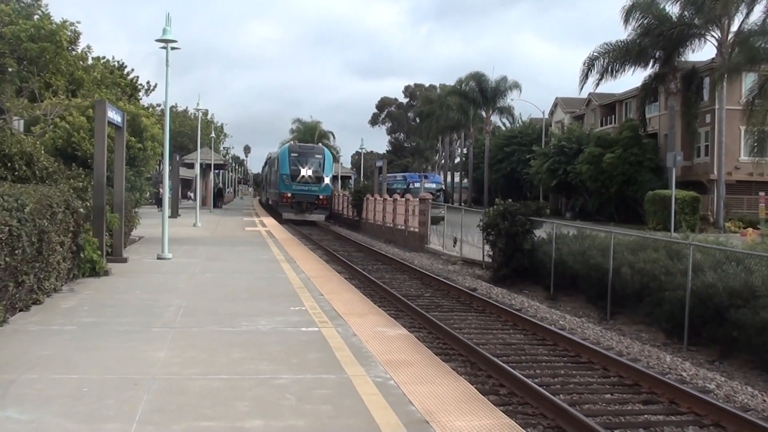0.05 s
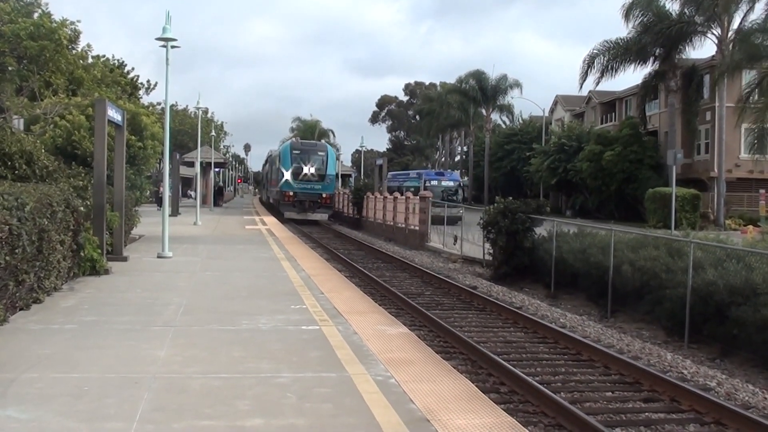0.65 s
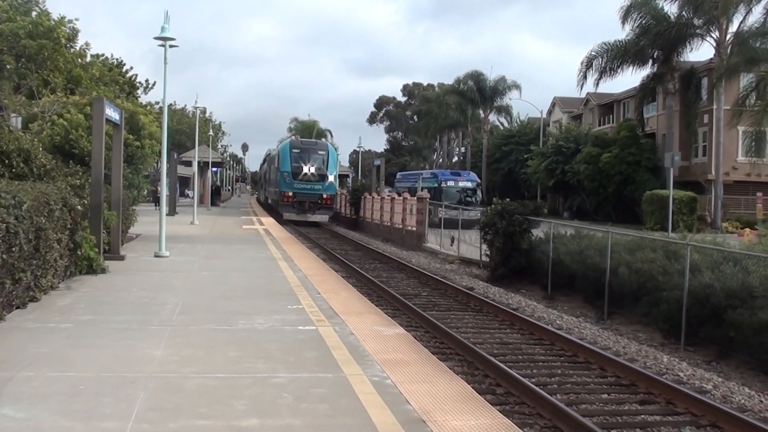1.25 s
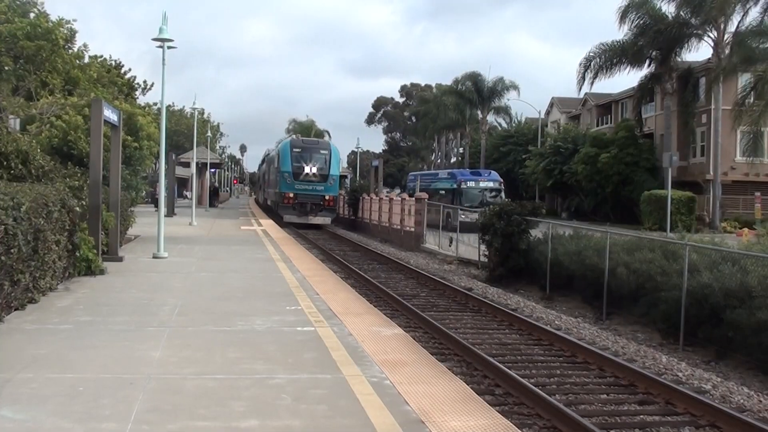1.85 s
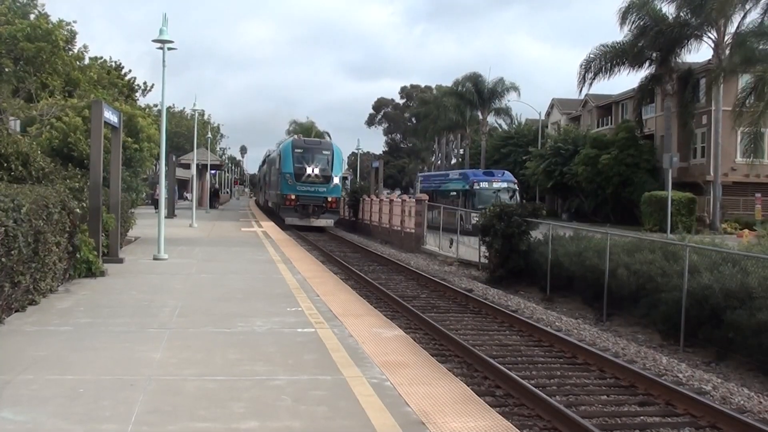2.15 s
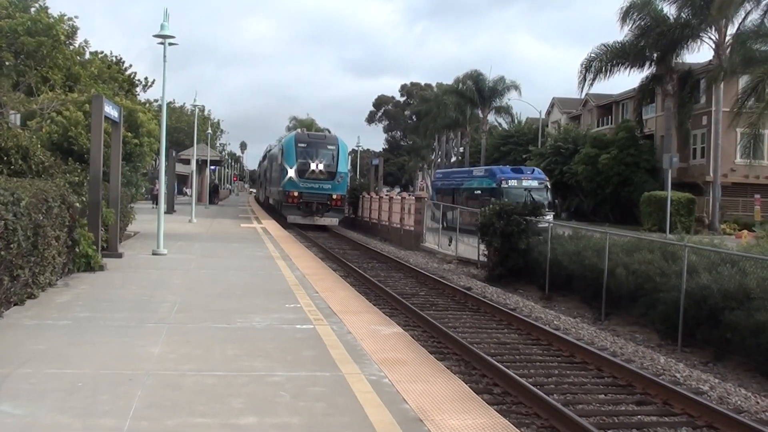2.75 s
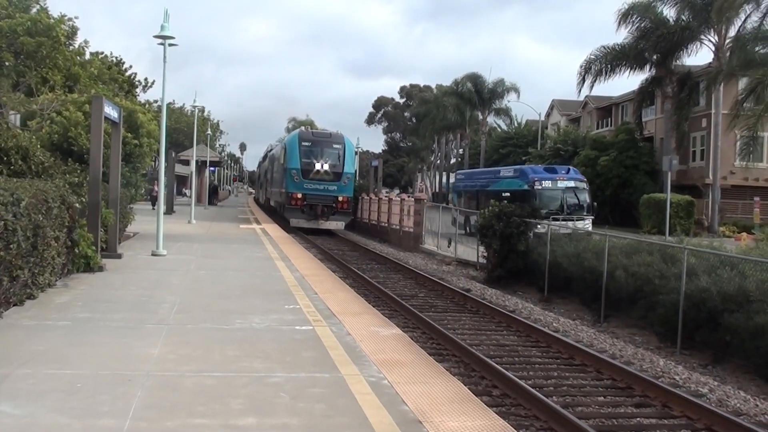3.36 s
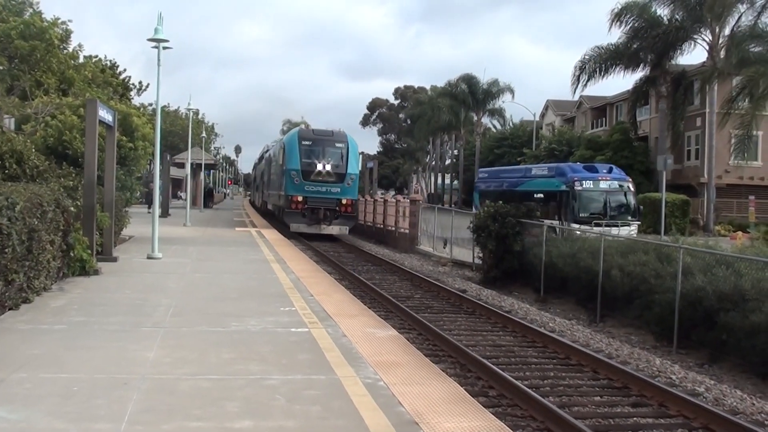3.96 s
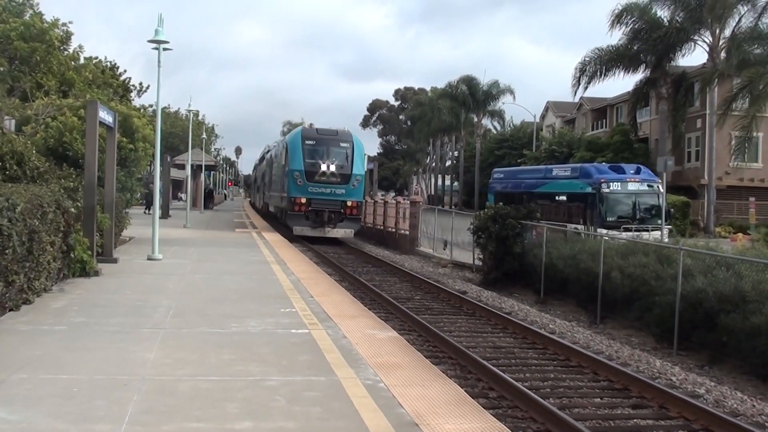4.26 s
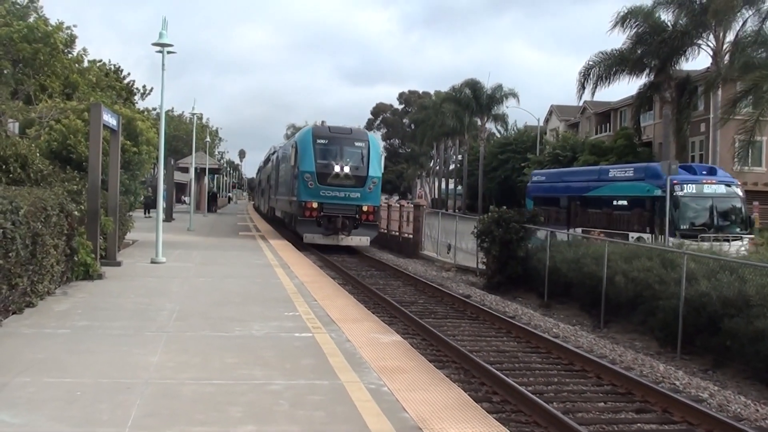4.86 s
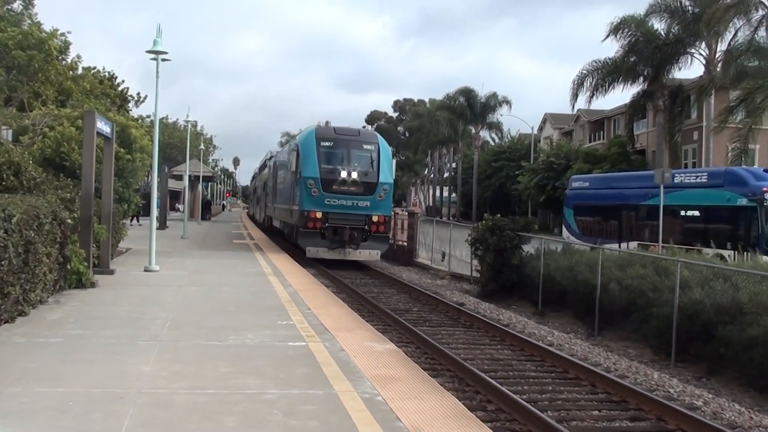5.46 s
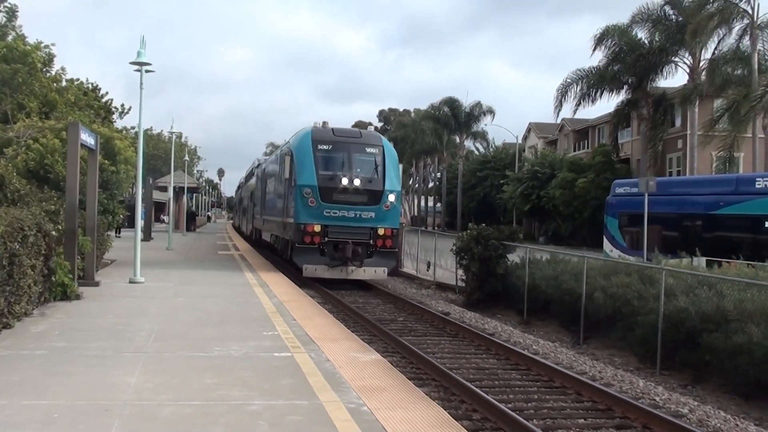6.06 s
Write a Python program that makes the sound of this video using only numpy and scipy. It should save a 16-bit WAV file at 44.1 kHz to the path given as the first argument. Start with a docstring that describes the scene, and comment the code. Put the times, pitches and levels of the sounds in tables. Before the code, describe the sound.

A diesel locomotive pulls out of an outdoor station towards a listener on the platform. Its bell clangs evenly, about three times every two seconds, ringing back off nearby buildings. Underneath, the engine rumble grows, a thin turbocharger whistle climbs and an electric whine swells. Faint ticks and soft knocks dot the first part, and brief spits of air come from halfway on as the train gets louder.

```python
"""A diesel locomotive rings its bell steadily as it pulls out of a station towards the listener.
Each blow gives a noisy clang and a throbbing ring. Underneath, the engine revs up, the turbocharger
whistles upwards, the traction drive sings and air valves spit, among small ticks and soft knocks.
Buildings beside and behind the train send bell and drive back with a smaller or reversed Doppler shift."""
import sys
import numpy as np
from scipy import signal
from scipy.fft import rfft, irfft, next_fast_len
from scipy.io import wavfile

SR = 44100
rng = np.random.default_rng(int(sys.argv[2]) if len(sys.argv) > 2 else 0)


def log_audio(samples):
    """Write samples as a 16-bit WAV file to the path given in sys.argv[1]."""
    # one column per channel
    frames = np.atleast_2d(samples).T
    # limit to full scale, then quantise
    limited = np.clip(frames, -1, 1)
    pcm = np.round(limited * 32767).astype(np.int16)
    wavfile.write(sys.argv[1], SR, pcm)


N = 269010
LEAD = SR  # samples of pre-roll, so the scene opens already ringing
TIME = np.arange(-LEAD, N) / SR

# colour of the microphone's own hiss: freq_hz, level_db
FLOOR_COLOUR = [(5000, 2.5), (9000, -3.5), (12000, -8), (16000, -8)]
# soft knocks around the station: start_s, pitch_hz, level_db, length_s
KNOCKS = [(2.034, 268, -25.5, 0.095), (2.438, 250, -28, 0.065), (2.786, 175, -28, .09),
          (2.95, 1005, -27.5, 0.076)]
# sharp ticks close by: start_s, level_db, t60_s
TICKS = [(1.2895, -22.5, 0.0039), (2.013, -28, 0.0039), (2.185, -22.5, .005), (2.3885, -28, .005),
         (2.8235, -24, 0.0055), (3.595, -27, 0.0049), (4.4245, -19, 0.0035), (5.1225, -25, .005)]
# colour of a tick: freq_hz, level_db
TICK_COLOUR = [(3000, -9.5), (5500, 1), (7300, 4.5), (9500, -7), (13000, -12), (16000, -16)]

# air valves spitting: start_s, level_db, t60_s
SPITS = [(4.122, -39, .3), (5.847, -30.5, 0.31), (5.958, -41.5, 0.95)]
# colour of a spit: freq_hz, level_db
SPIT_COLOUR = [(3000, -14), (5500, -2), (7000, 5), (9000, -6), (13000, -14), (16000, -26)]
# thin jets of escaping air: start_s, level_db, t60_s
JETS = [(2.992, -40.5, 0.77), (3.215, -48.5, .6)]
# colour of a jet: freq_hz, level_db
JET_COLOUR = [(9000, -35), (11300, -10), (12300, 1), (13500, 1), (15800, 1.5)]
# brief squeals of that air: start_s, level_db, t60_s
SQUEALS = [(3.0, -51, .7), (3.25, -48, .6)]
# narrow band of a squeal: freq_hz, level_db
SQUEAL_COLOUR = [(10100, -40), (10480, 0), (10620, 0), (11000, -40)]

# the train's speed towards the listener: time_s, speed_m_per_s
TRAIN_SPEED = [(-1, 1.135), (7, 5.575)]
# the diesel revving up: time_s, shaft_hz, hum_db
ENGINE_REVS = [(0, 22.3, -4), (1, 23, -4), (2, 24.4, 0), (3, 24.6, 2), (4, 25.2, 4.5), (5, 25.2, 6.5),
               (6.1, 25.7, 6.5)]
# orders of its hum: shaft_multiple, level_db
ENGINE_ORDERS = [(2, -60), (3, -54.5), (5, -43), (7, -36.5), (8, -40), (12, -40.5), (13, -47)]
# swells of the exhaust boom: time_s, level_db
BOOM_LEVEL = [(0.0, -40), (0.73, -43.5), (0.9, -32.5), (1.07, -42), (1.21, -32), (1.34, -53), (1.39, -37),
              (1.8, -42.5), (2.0, -32.5), (2.43, -44), (3.16, -42), (3.86, -47), (4.74, -36), (5.64, -41),
              (6.1, -33.5)]
# colour of the exhaust rumble: freq_hz, level_db
RUMBLE_COLOUR = [(15, -14.5), (33, -14), (52, -6.5), (72, 3.5), (92, 4), (120, 4.5), (160, -29)]
# colour of the engine body: freq_hz, level_db
BODY_COLOUR = [(85, -27.5), (125, -6.5), (180, -1.5), (240, -2), (300, -1), (400, -5.5), (520, -17),
               (700, -34)]
# colour of the fan roar: freq_hz, level_db
ROAR_COLOUR = [(350, -12), (530, -7.5), (660, 2), (850, 2), (1080, -3.5), (1250, -10), (1600, -3),
               (2000, -13.5), (2450, -7.5), (2900, -12.5), (3400, -10.5), (3900, -33), (5000, -26)]
# colour of the hiss on top: freq_hz, level_db
HISS_COLOUR = [(2500, -13.5), (3600, 1.5), (4500, 0.5), (5300, -1), (6300, -8.5), (7300, -4.5),
               (8500, -15.5), (10000, -19.5), (13000, -27), (16000, -34.5)]
# mix of rumble, body, roar and hiss, a row each: start_db, db_per_shaft_hz, db_per_metre
RUSH_MIX = [(-47, 0.54, 0.19), (-37, 1.32, 0.0939), (-36.5, 0.17, 0.2364), (-49.5, 0.88, .5)]
# stereo lean of that mix: freq_hz, left_minus_right_db
RUSH_PAN = [(60, -0.2), (250, -1.5), (600, -2.3), (1200, 4), (2500, 1), (4500, -2.5), (8000, 0)]

# the traction drive's tones at rest: pitch_hz, level_db
DRIVE_TONES = [(839.4, 0.5), (784, -10.5), (1052, -17.5), (1673, -9), (2540, -24), (3364, -15),
               (4210, -19.5)]
# swell of its song: time_s, level_db
DRIVE_LEVEL = [(0.0, -48), (1.0, -38.5), (2.45, -39.5), (3.1, -32), (5.16, -33), (5.48, -26), (5.58, -36),
               (5.62, -27.5), (6.02, -27.5)]
# the turbocharger's blade tone spooling up: time_s, pitch_hz
TURBO_PITCH = [(0, 2535), (2, 3027), (6.1, 4520)]
# swell of its whistle: time_s, blade_db, octave_db
TURBO_LEVEL = [(0, -50, -51), (.6, -48.5, -63), (2, -50, -59), (3.2, -40.5, -53.5), (3.8, -52, -43.5),
               (4.4, -40, -43), (4.8, -35.5, -51), (5.1, -41.5, -49), (5.6, -25, -49.5), (6.1, -24.5, -46)]

# blows on the bell: start_s, note_db, hit_db, top_db
BELL_STROKES = [(-.262, -6.5, -2.5, -6), (.423, -5.5, -3, -11), (1.110, -2, 0, -6), (1.797, 1, 1, -0.5),
                (2.484, -1, 2.5, 2), (3.169, -1.5, 2.5, -1.5), (3.855, -0.5, 2, -2), (4.541, 1, 2.5, -7),
                (5.220, -0.5, 5, 3), (5.904, -2.5, 6, 3)]
# its strike note at rest: pitch_hz, level_db, t60_s
STRIKE_NOTE = (1730, -11, 1.9)
# its slow-blooming top overtone at rest: pitch_hz, level_db, t60_s
TOP_NOTE = (4127.5, -32.5, 1.39)
# its other modes at rest: pitch_hz, level_db, t60_s
BELL_MODES = [(927, -34.5, 0.15), (1007, -26, 0.1), (1117.6, -21.5, 0.094), (1528, -23, 0.46),
              (1557, -28.5, 2.45), (2393, -35.5, 0.41), (2500, -44.5, 0.66), (2857, -34.5, 1.55),
              (2840, -29.5, 0.24), (3265, -40, .45), (3450, -36.5, .5), (3497, -38, 0.48),
              (5280, -52, 0.91), (5930, -52.5, 0.46)]
# colour of the clang: freq_hz, level_db
CLANG_COLOUR = [(600, -41), (950, 4), (1130, -11.5), (1330, -10.5), (1480, -2.5), (1570, 2), (1650, -0.5),
                (1770, 15.5), (1860, -3), (2000, -12.5), (2400, -8), (3500, -14), (3800, -21),
                (7000, -42.5)]


def gain_of(db):
    """Decibels as a gain."""
    return 10 ** (np.asarray(db) / 20)


def unit_rms(x):
    """Normalises a signal to an RMS of one."""
    return x / np.sqrt(np.mean(x ** 2) + 1e-20)


def follow(rows):
    """One automation curve for each column after the time."""
    times, *columns = np.transpose(rows)
    return [np.interp(TIME, times, column) for column in columns]


def equalise(x, curve):
    """Filters by an EQ curve of (freq_hz, level_db) points."""
    hz, db = np.transpose(curve)
    size = next_fast_len(len(TIME))
    bins_hz = np.fft.rfftfreq(size, 1 / SR)
    response = gain_of(np.interp(np.log(bins_hz + 1), np.log(hz), db))
    return irfft(rfft(x, size) * response, size)[..., :len(TIME)]


def noise(colour):
    """Coloured noise of unit level, rolled off beyond the curve's ends."""
    curve = [(colour[0][0] / 2, -90), *colour, (colour[-1][0] * 2, -90)]
    return unit_rms(equalise(rng.standard_normal(len(TIME)), curve))


def wander(hz):
    """Random modulation of unit size, moving at up to about hz."""
    knots = np.arange(TIME[0], TIME[-1] + 1, .5 / hz)
    return unit_rms(np.interp(TIME, knots, rng.standard_normal(4096)[:len(knots)]))


def burst(start_s, t60_s, rise_s):
    """Envelope with a rounded attack and an exponential tail."""
    envelope = np.zeros(len(TIME))
    at = max(round(start_s * SR) + LEAD, 0)
    age = np.arange(len(TIME) - at)[:int(t60_s * SR) + 1] / SR
    envelope[at:at + len(age)] = (1 - np.exp(-age / rise_s)) ** 2 * gain_of(-60 * age / t60_s)
    return envelope


def noise_bursts(cues, colour, rise_s):
    """A dying burst of coloured noise on each cue."""
    return noise(colour) * sum(gain_of(db) * burst(start_s, t60_s, rise_s) for start_s, db, t60_s in cues)


def pan(x, left_db):
    """Mono to stereo, with the left channel left_db above the right."""
    return x * gain_of([[left_db / 2], [-left_db / 2]])


def metres_travelled():
    """Distance the train has rolled."""
    return np.cumsum(follow(TRAIN_SPEED)[0]) / SR


def travel_saved():
    """Seconds of sound travel saved as the train nears, zero at mid-scene."""
    saved_s = metres_travelled() / 343
    return saved_s - saved_s[LEAD + N // 2]


def station(x, echo_db, left_db, spread_s=.3, fade_db=9, width_db=10, walls=20):
    """Direct sound plus wall echoes; each path shortens or lengthens as the train moves."""
    saved_s = travel_saved()
    jitter, bearings, sides = rng.random((walls, 3)).T
    lateness = (np.arange(walls) + jitter) / walls
    gains = gain_of(-fade_db * lateness)
    gains *= gain_of(echo_db) / np.linalg.norm(gains)
    cosines = np.clip(.75 - 2 * bearings, -1, 1)  # walls ahead raise the pitch, walls behind lower it
    out = pan(np.interp(TIME + saved_s, TIME, x), left_db)
    for delay_s, cosine, gain, side in zip(.012 + spread_s * lateness, cosines, gains, sides):
        echo = gain * np.interp(TIME - delay_s + cosine * saved_s, TIME, x)
        out += pan(echo, width_db * (side - .5))
    return out


def noise_floor(level_db=-56):
    """The microphone's own steady hiss."""
    return gain_of(level_db) * noise(FLOOR_COLOUR)


def knocks():
    """Distant knocks, blurred to short swells of one resonance."""
    out = np.zeros(len(TIME))
    for start_s, hz, db, length_s in KNOCKS:
        swell = np.sin(np.pi * np.clip((TIME - start_s) / length_s, 0, 1)) ** 2
        out += gain_of(db) * swell * np.sin(2 * np.pi * hz * TIME)
    return out


def ticks():
    """Dry, bright ticks: a few milliseconds of noise each."""
    return noise_bursts(TICKS, TICK_COLOUR, rise_s=.0001)


def air_valves():
    """Air escapes in sharp spits, thin jets and brief squeals."""
    spits = noise_bursts(SPITS, SPIT_COLOUR, rise_s=.0011)
    jets = noise_bursts(JETS, JET_COLOUR, rise_s=.0083)
    squeals = noise_bursts(SQUEALS, SQUEAL_COLOUR, rise_s=.037)
    return spits + jets + squeals


def engine_rush(flutter_db=.96, side_db=-24):
    """Exhaust rumble, engine body, fan roar and hiss grow as the engine revs up and the train nears."""
    out = np.zeros((2, len(TIME)))
    shaft_hz, metres = follow(ENGINE_REVS)[0], metres_travelled()
    colours = [RUMBLE_COLOUR, BODY_COLOUR, ROAR_COLOUR, HISS_COLOUR]
    for colour, (start_db, db_per_hz, db_per_metre) in zip(colours, RUSH_MIX):
        db = start_db + db_per_hz * (shaft_hz - shaft_hz[LEAD]) + db_per_metre * (metres - metres[LEAD])
        mid, side = noise(colour), gain_of(side_db) * noise(colour)
        out += np.array([mid + side, mid - side]) * gain_of(db + flutter_db * wander(12))
    left_eq = np.array(RUSH_PAN) * [1, .5]
    right_eq = left_eq * [1, -1]
    return np.array([equalise(out[0], left_eq), equalise(out[1], right_eq)])


def engine_hum(waver=.0037, flutter_db=2, boom_db=1):
    """Low orders of the diesel, each a little unsteady, and its exhaust booming on the fourth."""
    shaft_hz, hum_db = follow(ENGINE_REVS)
    phase = 2 * np.pi * np.cumsum(shaft_hz * (1 + waver * wander(8))) / SR
    hum = sum(gain_of(db + flutter_db * wander(6.7)) * np.sin(order * phase)
              for order, db in ENGINE_ORDERS)
    boom = gain_of(boom_db + follow(BOOM_LEVEL)[0]) * np.sin(4 * phase)
    return pan(hum * gain_of(hum_db) + boom, left_db=-1.8)


def traction_drive(trim_db=1.5, waver=.00061):
    """The drive sings on fixed switching tones, Doppler-shifted by the train's motion."""
    phase_per_hz = 2 * np.pi * np.cumsum(1 + waver * wander(15)) / SR
    tones = sum(gain_of(db) * np.sin(hz * phase_per_hz) for hz, db in DRIVE_TONES)
    return station(tones, echo_db=-2.5, left_db=-2) * gain_of(trim_db + follow(DRIVE_LEVEL)[0])


def smear(phase, width_hz):
    """A tone smeared into a narrow band of noise."""
    return (wander(width_hz) * np.sin(phase) + wander(width_hz) * np.cos(phase)) / np.sqrt(2)


def turbocharger(waver=.002, clean_db=-1, fuzz_db=-6, third_db=-69, flutter_db=1.5):
    """The blade tone and its overtones climb as the turbocharger spools up; turbulence smears them."""
    pitch_hz = follow(TURBO_PITCH)[0]
    blade_db, octave_db = follow(TURBO_LEVEL)
    phase = 2 * np.pi * np.cumsum(pitch_hz * (1 + waver * wander(40))) / SR
    blade = gain_of(clean_db) * np.sin(phase) + gain_of(fuzz_db) * smear(phase, width_hz=70)
    octave = gain_of(octave_db) * smear(2 * phase, width_hz=110)
    third = gain_of(third_db) * smear(3 * phase, width_hz=110)
    return gain_of(blade_db + flutter_db * wander(10)) * blade + octave + third


def turbo_whistle(direct_db=-1, echo_db=-3, spread_s=.24, echoes=14):
    """The turbocharger's older, lower pitch lingers in echoes and beats with the new."""
    tone = turbocharger()
    out = pan(gain_of(direct_db) * tone, left_db=-2.5)
    for lateness, side in rng.random((echoes, 2)):
        echo = np.roll(tone, int(spread_s * lateness * SR)) * gain_of(echo_db) / np.sqrt(echoes)
        out += pan(echo, left_db=12 * (side - .6))
    return out


def ring(age, modes, rise_s):
    """Dying modes of random phase, choked over the last 10 ms as the next blow lands."""
    choke = np.minimum((age[-1] - age) / .01, 1)
    tones = sum(gain_of(db - 60 * age / t60_s) * np.sin(2 * np.pi * (hz * age + rng.random()))
                for hz, db, t60_s in modes)
    return tones * choke * (1 - np.exp(-age / rise_s)) ** 2


def throb(age, rate_hz=3.16, depth_db=2, crest_s=.046):
    """Gain of the slow beat in the strike note, alike after every blow."""
    return gain_of(depth_db * np.cos(2 * np.pi * rate_hz * (age - crest_s)))


def bell_clang(level_db=-22, clatter_db=-10):
    """The noise of each blow: a short clang with a quieter, longer clatter."""
    envelope = np.zeros(len(TIME))
    for start_s, _, hit_db, _ in BELL_STROKES:
        clang = burst(start_s, t60_s=.3, rise_s=.006)
        clatter = gain_of(clatter_db) * burst(start_s, t60_s=1, rise_s=.01)
        envelope += gain_of(hit_db) * (clang + clatter)
    return pan(gain_of(level_db) * envelope * noise(CLANG_COLOUR), left_db=-.5)


def bell(shimmer_db=2):
    """Each blow restarts the modes and adds a clang; the strike note and top overtone bloom later."""
    note, modes, top = np.zeros((3, len(TIME)))
    saved_s = travel_saved()
    starts = [s + np.interp(s, TIME, saved_s) for s, *_ in BELL_STROKES]  # on the train's own clock
    ends = starts[1:] + [TIME[-1]]
    for start_s, end_s, (_, note_db, hit_db, top_db) in zip(starts, ends, BELL_STROKES):
        span = slice(round(start_s * SR) + LEAD, round(end_s * SR) + LEAD + SR // 100)
        age = TIME[span] - TIME[span][0]
        note[span] += gain_of(note_db) * ring(age, [STRIKE_NOTE], rise_s=.01) * throb(age)
        modes[span] += gain_of(hit_db) * ring(age, BELL_MODES, rise_s=.0033)
        top[span] += gain_of(top_db) * ring(age, [TOP_NOTE], rise_s=.024)
    note = station(note, echo_db=-7, left_db=3.5, width_db=13.5)
    clang = bell_clang()
    modes = station(modes, echo_db=-2.5, left_db=2)
    top = station(top, echo_db=-3.5, left_db=-1.5, spread_s=.15)
    return note + clang + (modes + top) * gain_of(shimmer_db * wander(14))


def scene():
    """The train, its air valves and the station ambience, with the pre-roll trimmed off."""
    train = bell() + turbo_whistle() + traction_drive() + engine_hum() + engine_rush()
    mix = train + air_valves() + ticks() + knocks() + noise_floor()
    return mix[:, LEAD:]


def record(dry, cutoff_hz=15850):
    """A steep low-pass on the whole mix."""
    lowpass = signal.firwin(511, cutoff_hz, window=("kaiser", 9), fs=SR)
    return signal.oaconvolve(dry, lowpass[None], "same")


dry = scene()
out = record(dry)
log_audio(out)
```